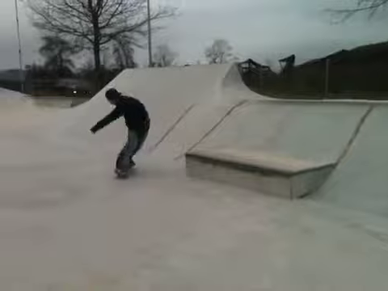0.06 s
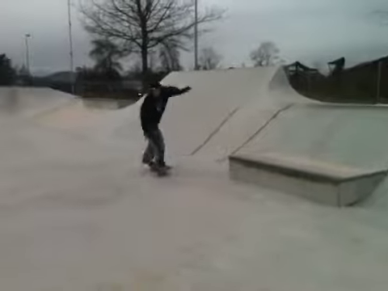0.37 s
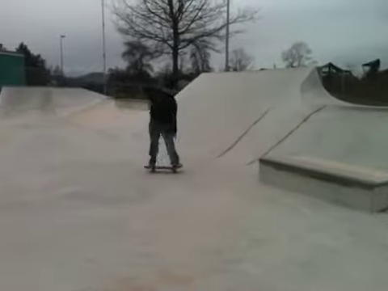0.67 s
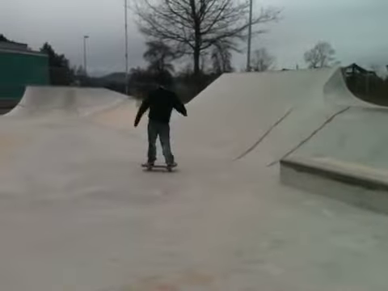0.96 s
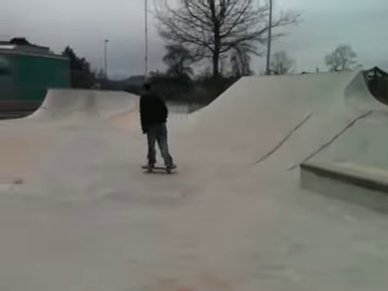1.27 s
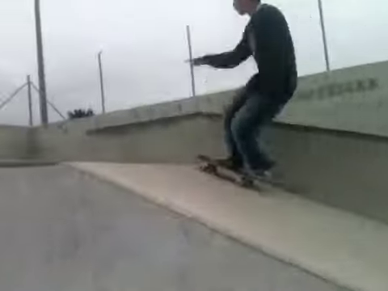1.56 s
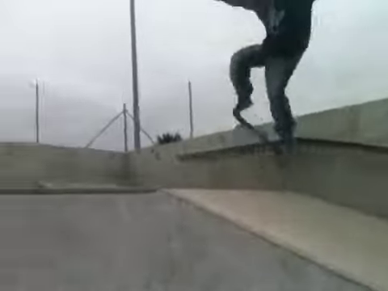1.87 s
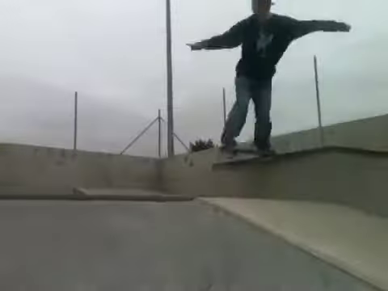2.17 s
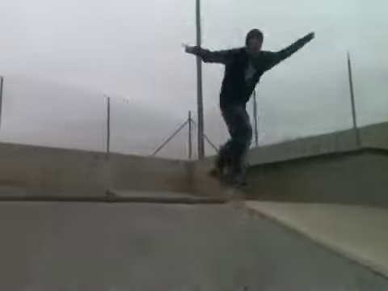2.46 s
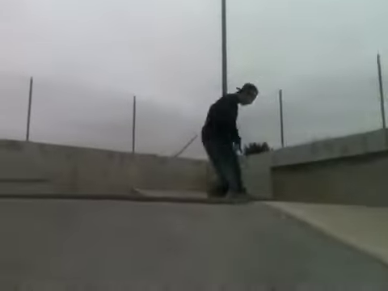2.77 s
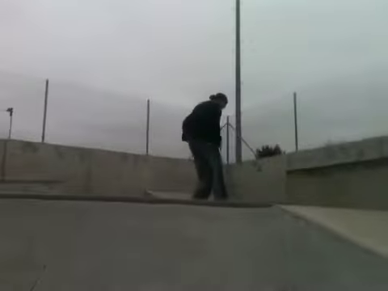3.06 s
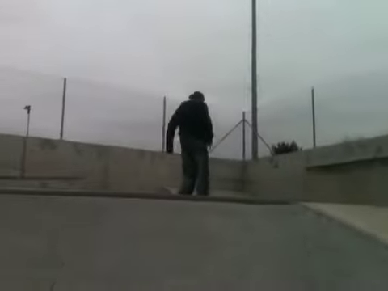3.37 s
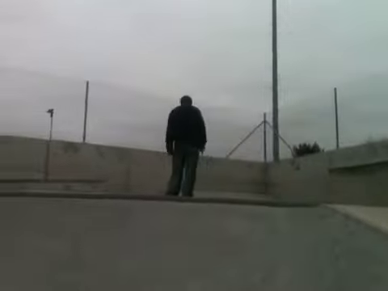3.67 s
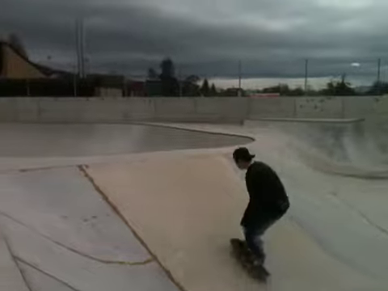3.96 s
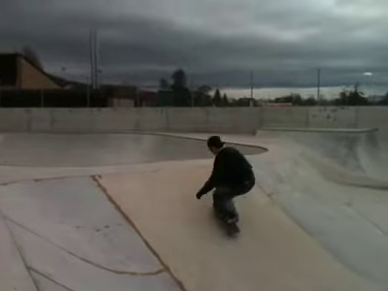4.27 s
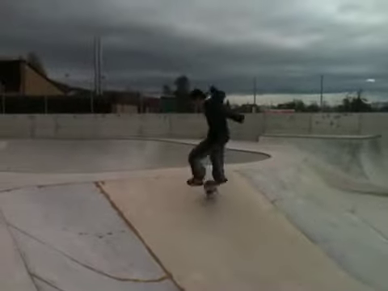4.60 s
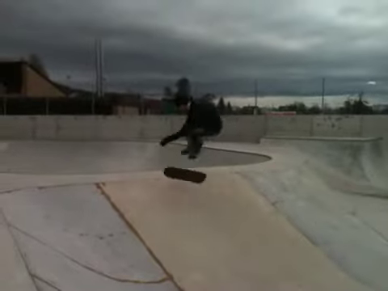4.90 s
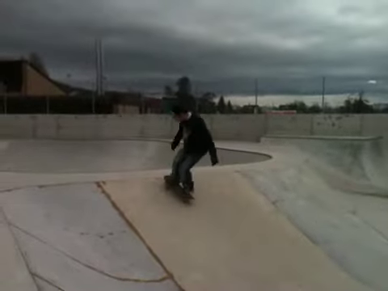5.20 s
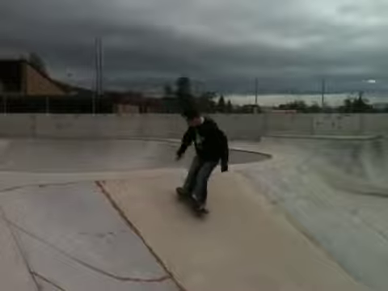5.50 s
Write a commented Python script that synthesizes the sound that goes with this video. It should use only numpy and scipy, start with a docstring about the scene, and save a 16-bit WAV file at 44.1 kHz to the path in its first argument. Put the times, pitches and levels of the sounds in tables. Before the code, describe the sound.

At an open-air skate park, a skateboard clacks down and rolls softly over concrete, a distant engine barely humming behind it. A sharp pop leads to a cluster of wooden knocks and metal clicks, with short echoes off the ramps. Then gusts thump on the microphone as the wheels roar past close by. Another pop and a brief gap end in the loudest landing, and the board rattles on.

```python
"""A concrete skate park, one small microphone, three scenes one after the other: the flat, a ledge and a bank.
A skateboarder pivots, ollies onto the ledge and off, then passes close by to flip on the bank. Wheels roar on
the grain of the slab; tail, trucks and wheels knock the wooden deck in quick clusters, echoed by the ramps.
Wind buffets the microphone at the bank; a far engine hums over quiet open air."""
import sys
import numpy as np
from scipy import signal
from scipy.fft import rfft, irfft, next_fast_len
from scipy.io import wavfile

SR = 44100
rng = np.random.default_rng(int(sys.argv[2]) if len(sys.argv) > 2 else 0)


def to_wav(sig):
    """Store sig (one row per channel, or 1-D mono) as 16-bit WAV at the path in sys.argv[1].

    Samples outside -1..1 are clipped; the rate is SR.
    """
    pcm = np.clip(np.atleast_2d(sig), -1, 1) * 32767
    pcm = np.round(pcm).astype(np.int16)
    wavfile.write(sys.argv[1], SR, pcm.T)  # frames by channels


N = 244314
T = np.arange(N) / SR
RING_T = np.arange(8192) / SR  # time within one hit
# the scene changes at these times, from the flat to the ledge to the bank: t/s
SPOT_BOUNDS = [0, 1.444, 3.72, 5.6]
BANK_START_S = SPOT_BOUNDS[2]


def undb(db):
    """Decibels to gain."""
    return 10 ** (np.asarray(db) / 20)


def unit(x):
    """Scale to rms 1."""
    return x / np.sqrt(np.mean(x ** 2))


def unit_hit(x):
    """Scale a hit to the energy of 10 ms at rms 1."""
    return x / np.sqrt(np.sum(x ** 2) / (SR / 100))


def add(out, s, x):
    """Mix x into out from time s."""
    i = max(int(s * SR), 0)
    out[i:i + len(x)] += x[:max(N - i, 0)]


def highpass(x, hz, order=2):
    """Cut the bass below hz."""
    return signal.sosfilt(signal.butter(order, hz, "highpass", fs=SR, output="sos"), x)


def colour(x, points):
    """Causal filter that follows (f/Hz, level/dB) points."""
    size = next_fast_len(len(x) + 2048) // 2 * 2
    hz, db = np.transpose(points)
    log_gain = np.interp(np.log(np.fft.rfftfreq(size, 1 / SR) + 1), np.log(hz), db) * np.log(10) / 20
    cepstrum = irfft(log_gain)
    cepstrum[1:size // 2] *= 2  # fold to minimum phase
    cepstrum[size // 2 + 1:] = 0
    return irfft(rfft(x, size) * np.exp(rfft(cepstrum)))[:len(x)]


def walk(rate):
    """Random levels 1 / rate s apart, joined by straight lines; spread near 1."""
    knots = rng.standard_normal(2048)
    return np.interp(T * rate, np.arange(len(knots)), knots)


def fade(t60, t=RING_T):
    """Exponential decay, 60 dB down after t60 seconds."""
    return np.exp(-np.log(1000) * t / t60)


def bell(centre_s, half_s, t=T):
    """Smooth Gaussian rise and fall."""
    return np.exp(-((t - centre_s) / half_s) ** 2)


def stretch(start, end, db, fade_db_per_s, attack_s=0.013, release_s=0.016):
    """Gain of a sound that sets in quickly, fades evenly and dies away at its end."""
    gate = np.clip((T - start) / attack_s, 0, 1) * np.exp(-np.maximum(T - end, 0) / release_s)
    return gate * undb(db - fade_db_per_s * (np.clip(T, start, end) - start))


def grains(spread_db):
    """Dense tiny impacts of uneven size, as of wheels on the grain of concrete."""
    size = np.repeat(rng.standard_normal(N // 64 + 1), 64)[:N]
    return rng.standard_normal(N) * undb(spread_db * size)


def resonance(hz, width_hz, spread_db=0):
    """A band of noise driven by grains; its centre may move."""
    lowpass = signal.butter(2, width_hz / 2, fs=SR, output="sos")
    drive = signal.sosfilt(lowpass, grains(spread_db) + 1j * grains(spread_db))
    phase = 2 * np.pi * np.cumsum(hz * np.ones(N)) / SR
    return unit(np.real(drive * np.exp(1j * phase)))


def ring(modes, detune):
    """Struck modes; the point that is hit sets each one's sign and shifts it a little."""
    chance = rng.standard_normal((len(modes), 2))
    return sum(np.sign(side) * undb(db) * fade(t60) * np.sin(2 * np.pi * hz * (1 + detune * by) * RING_T)
               for (hz, db, t60), (side, by) in zip(modes, chance))


# spectrum of the open air around the park: f/Hz, level/dB
AIR_TONE = [(25, -14), (70, -9.5), (120, -1), (200, 1.5), (330, -4.5), (430, -8), (600, -6.5), (1000, -6.5),
            (1700, -10.5), (2400, -20.5), (3100, -24), (4400, -25.5), (7000, -28), (13000, -29.5),
            (15500, -32)]

def open_air(db=-61.5, wander_db=0.7):
    """A soft wash of distant noise that drifts in level."""
    return unit(colour(rng.standard_normal(N), AIR_TONE)) * undb(db + wander_db * walk(rate=2.2))


# pulls of an engine, far off: start/s, end/s, first firing f/Hz, last f/Hz, start level/dB, swell/(dB/s)
ENGINE_PULLS = [(0, 1.46, 161, 165.5, -67, 4.5), (2.259, 2.604, 114.5, 114.6, -71, -1),
                (2.788, 3.743, 146, 169.8, -69, 8.5)]

def far_engine(octave_db=-14):
    """An engine hums at its firing rate: it holds its speed, drops and pulls up again."""
    waver = 1 + 0.005 * walk(rate=10)
    sway = undb(1.2 * walk(rate=6))
    out = np.zeros(N)
    for start, end, start_hz, end_hz, db, swell_db_per_s in ENGINE_PULLS:
        firing_hz = np.interp(T, [start, end], [start_hz, end_hz]) * waver
        phase = 2 * np.pi * np.cumsum(firing_hz) / SR
        hum = unit(np.sin(phase) + undb(octave_db) * np.sin(2 * phase))
        out += hum * stretch(start, end, db, -swell_db_per_s)
    return out * sway


# gusts on the microphone at the bank: t/s, peak level/dB, half length/s
GUSTS = [(3.789, -37.5, 0.027), (3.851, -26, 0.021), (3.964, -34.5, 0.065), (4.146, -27, 0.045),
         (4.22, -25.5, 0.031), (4.492, -60, 0.0085), (4.935, -40, 0.011), (4.995, -36, 0.01),
         (5.037, -41, 0.017), (5.206, -36, 0.094), (5.348, -34.5, 0.0076), (5.53, -41.5, 0.035)]
# strongest eddies, right on the microphone port: t/s, peak level/dB, half length/ms
EDDIES = [(3.79, -24, 1.3), (3.841, -19, 0.9), (3.888, -24, 1.3), (3.963, -23.5, 0.61), (4.128, -20, 0.69),
          (4.143, -18.5, 1.3), (4.162, -19.5, 0.85), (4.2211, -11.5, 0.45), (4.247, -19, 0.77),
          (4.283, -28.5, 1.46), (5.225, -19, 0.65)]

def wind(breeze_db=-59.5, bass_cut_hz=145, lead_s=0.01):
    """Gusts of low turbulence and single pressure bumps, which ring in the microphone's bass cut."""
    strength = undb(breeze_db) + sum(undb(db) * bell(s, half_s) for s, db, half_s in GUSTS)
    tone = [(60, 1.5), (160, 7.5), (280, -5), (400, -8.5), (700, -23), (1500, -35.5), (4000, -110)]
    rumble = highpass(colour(rng.standard_normal(N), tone), bass_cut_hz, order=4)
    out = unit(rumble) * strength * (T >= BANK_START_S)
    for s, db, half_ms in EDDIES:
        bump = highpass(bell(lead_s, half_ms / 1000, RING_T), bass_cut_hz, order=4)
        add(out, s - lead_s, undb(db) * bump / np.abs(bump).max())
    return out


# how strongly the knocks reach the concrete around the rider: t/s, level/dB
ECHO_SEND = [(0, -3), (1.4, 12), (1.5, 3), (2.7, 10), (4.7, 8), (5.1, 0.5), (5.54, 3)]

def ramp_echoes(hits, early_db=-16, early_t60=0.26, late_db=-25, late_t60=1.0):
    """Scattered reflections off nearby ramps, then a faint tail from the far walls."""
    sent = hits * undb(np.interp(T, *np.transpose(ECHO_SEND)))
    t = T[:SR]
    early = rng.standard_normal(SR) ** 3 * fade(early_t60, t) * (t > 0.012)  # cubed: sparse spikes
    late = rng.standard_normal(SR) * fade(late_t60, t) * np.clip(t / 0.02, 0, 1)
    response = (undb(early_db) * unit(early) + undb(late_db) * unit(late)) / np.sqrt(SR)
    echoes = signal.fftconvolve(sent, response)[:N]
    return colour(echoes, [(200, -5.5), (1500, -8.5), (4000, -5.5), (12000, -17)])


# delay of the bank's reflection at the microphone: t/s, lag/ms
BANK_LAG = [(3.73, 0.6), (4.08, 0.56), (4.19, 0.71), (4.4, 0.8), (5.54, 0.83)]

def with_bank_reflection(x, bounce):
    """The bank reflects the middle range; the path grows as the rider climbs, so the dips slide down."""
    lag_s = np.interp(T, *np.transpose(BANK_LAG)) / 1000
    mids = signal.sosfiltfilt(signal.butter(3, [700, 6500], "bandpass", fs=SR, output="sos"), x)
    return x + bounce * (T >= BANK_START_S) * np.interp(T - lag_s, T, mids)


# spectrum of the hollow ramp by the ledge: f/Hz, level/dB
HOLLOW_TONE = [(80, -37), (150, -29), (220, -2), (280, -5), (345, 3), (410, -4), (505, 1), (580, 0.5),
               (720, -11), (1400, -37), (4000, -61.5)]
# its rumbles: start/s, end/s, start level/dB, fade/(dB/s)
HOLLOW_RUMBLES = [(1.44, 1.723, -41.5, 45.5), (3.336, 3.727, -60.5, 10)]

def hollow_ramp():
    """The ramp rumbles hollowly under the wheels."""
    rumble = unit(colour(rng.standard_normal(N), HOLLOW_TONE))
    return rumble * sum(stretch(*row) for row in HOLLOW_RUMBLES)


# noise bands at all three spots: t/s, centre f/Hz, glide/(octaves/s), width/Hz, level/dB, half length/s
SCRAPES_AND_RASPS = [(0.805, 4500, 0.5, 3000, -69, 0.03), (2.3, 1774, 0.5, 90, -67, 0.08),
                     (2.395, 810, 0.5, 130, -59, 0.076), (2.465, 835, -1, 300, -55, 0.026),
                     (2.795, 4130, 0.5, 700, -64.5, 0.032), (2.886, 3770, 0.5, 400, -65, 0.06),
                     (3.741, 3170, 1, 800, -50.5, 0.016), (3.813, 3100, -0.5, 900, -51, 0.065),
                     (4.593, 4700, -3, 2000, -53.5, 0.016), (4.635, 4400, -1, 1800, -60, 0.017),
                     (5.423, 2030, -1.5, 260, -54, 0.04), (5.484, 1450, -2, 149, -47, 0.028)]

def scrapes_and_rasps():
    """Short gliding noise bands: scrapes, squeals and the rasp of grit coloured by the bank's reflection."""
    out = np.zeros(N)
    for s, hz, octaves_per_s, width_hz, db, half_s in SCRAPES_AND_RASPS:
        pitch = hz * 2 ** (octaves_per_s * np.clip(T - s, -2 * half_s, 2 * half_s))
        out += resonance(pitch, width_hz, spread_db=5.5) * undb(db) * bell(s, half_s)
    return out


# whirr of a free wheel: f/Hz, level/dB
SPIN_TONE = [(200, -24), (600, 0.5), (1300, 3.5), (1800, 4), (2600, -2), (6000, -28)]
# hiss of the bearings, and of grit on the flat and by the ledge: f/Hz, level/dB
HISS_TONE = [(1800, 0), (3000, -6.5), (3800, 2), (4700, 0), (5600, -5), (6800, -8), (8500, -5.5),
             (11000, -12.5), (14000, -20), (16000, -36)]
# flights at the ledge and the bank: start/s, end/s, whirr level/dB, relative hiss/dB
FLIGHTS = [(1.81, 2.095, -59, 0), (4.705, 5.093, -62, -10.5)]

def free_wheels():
    """In the air the wheels whirr and their bearings hiss, slowly fading."""
    whirr = unit(colour(rng.standard_normal(N), SPIN_TONE))
    bearings = unit(colour(grains(spread_db=-1), HISS_TONE))
    return sum((whirr + undb(hiss_db) * bearings) * stretch(start, end, db, fade_db_per_s=2)
               for start, end, db, hiss_db in FLIGHTS)


def climb(pass_s=4.018, pass_db=-40.5, nearest_m=0.75, speed_m_s=5.83, crest_s=4.92):
    """Gain of the ride past the microphone until take-off: it falls with distance and toward the crest."""
    speed_share = np.maximum(crest_s - T, 0) / (crest_s - pass_s)
    distance_m = np.hypot(nearest_m, speed_m_s * (T - pass_s))
    take_off_s = FLIGHTS[-1][0]
    return stretch(BANK_START_S, take_off_s, pass_db, 0) * speed_share * nearest_m / distance_m


# modes of the wooden deck, stirred by rolling and by knocks: f/Hz, level/dB, t60/s
DECK_MODES = [(330, -4, 0.18), (496, -4.5, 0.07), (585, 4.5, 0.058), (749.5, -6, 0.088), (836, 6, 0.037),
              (930, -15.5, 0.045), (1028, -10.5, 0.028), (1146, -4.5, 0.046), (1305, 8, 0.026),
              (1477, -1.5, 0.064), (1620, 4.5, 0.046), (1756, 7.5, 0.038), (1986, 2, 0.051),
              (2280, 7, 0.023)]

def rolling(roar_gain, hiss_gain, roar_tone, grit_tone, grit_spread_db=2, deck_db=-4):
    """Wheels drive the deck into a roar and crush grit into a hiss; both flutter with the slab."""
    flutter = undb(0.3 * walk(rate=37))
    wheel = unit(colour(grains(spread_db=-1), roar_tone))
    jolts = colour(grains(spread_db=6.5), roar_tone)
    deck = unit(signal.fftconvolve(jolts, ring(DECK_MODES, detune=0.0016))[:N])
    grit = unit(colour(grains(grit_spread_db), grit_tone))
    return (unit(wheel + undb(deck_db) * deck) * roar_gain + grit * hiss_gain) * flutter


# roar of the wheels on the flat, by the ledge and on the bank: f/Hz, level/dB
ROAR_FLAT = [(100, -28), (220, 3.5), (400, -8), (750, 1), (1200, -4), (1700, -6), (2300, -9), (3000, -18),
             (5000, -36)]
ROAR_LEDGE = [(60, -38), (120, -25), (220, -8), (350, 4.5), (510, 2), (700, 2.5), (900, 5), (1300, 4.5),
              (1900, 8), (2400, 5.5), (2900, -13), (5000, -24.5)]
ROAR_BANK = [(100, 10.5), (250, -12), (360, 9.5), (450, 6), (590, 13), (750, 7.5), (1050, 3), (1700, 1.5),
             (2400, 2), (3300, -7.5), (5000, -24)]
# hiss of grit on the bank, close to the microphone: f/Hz, level/dB
BANK_HISS_TONE = [(1800, -3.5), (2700, 4), (3300, 1), (4200, 5), (5200, 5.5), (6800, 5), (8500, 2.5),
                  (11000, -2.5), (13300, -21), (16000, -36)]
# runs over the concrete: start/s, end/s, start level/dB, fade/(dB/s), relative hiss/dB
ROLLS = [(0, 0.218, -40.5, 62, -4), (0.266, 0.653, -55.5, 7.5, -8.5), (0.726, 1.45, -57.5, 6.5, -11),
         (1.44, 1.853, -46.5, 18.5, -2), (2.1, 2.616, -48, 35.5, -3), (2.664, 3.283, -61, 23.5, 1),
         (3.263, 3.72, -62.5, 16, -5.5), (3.704, 3.915, -61, 37, -18), (5.174, 5.52, -53.5, -3.5, -12.5)]

def wheels(climb_grit_db=-10.5):
    """The wheels roll over the flat, by the ledge and up the bank, each with its own surface."""
    roar, hiss = np.zeros((2, len(SPOT_BOUNDS) - 1, N))
    for start, end, db, fade_db_per_s, grit_db in ROLLS:
        spot = np.searchsorted(SPOT_BOUNDS, (start + end) / 2) - 1
        gain = stretch(start, end, db, fade_db_per_s)
        roar[spot] += gain
        hiss[spot] += gain * undb(grit_db)
    uphill = climb()
    roar[2] += uphill
    hiss[2] += uphill * undb(climb_grit_db)
    flat = rolling(roar[0], hiss[0], ROAR_FLAT, HISS_TONE)
    ledge = rolling(roar[1], hiss[1], ROAR_LEDGE, HISS_TONE)
    bank = rolling(roar[2], hiss[2], ROAR_BANK, BANK_HISS_TONE, grit_spread_db=1.5)
    return flat + ledge + with_bank_reflection(bank, bounce=0.33)


def chatter(t60_ms, rebounds_db=-1):
    """Force of a contact: a first strike, then ever smaller rebounds and scrapes as it settles."""
    size = rng.standard_normal(len(RING_T))
    force = undb(rebounds_db) * size * np.abs(size) * fade(max(t60_ms, 1) / 1000)
    force[0] = 5  # the first strike
    return force


def struck(modes, force):
    """Modes driven by the force of a contact."""
    return unit_hit(signal.fftconvolve(ring(modes, detune=0.012), force)[:len(RING_T)])


def crack(tone, chatter_ms, t60, rise_s=0.0006):
    """Noise of a contact: its force takes a moment to build, and chatter draws it out."""
    rise = 1 - np.exp(-RING_T / rise_s)
    decay = fade(np.hypot(t60, chatter_ms / 1000))
    return unit_hit(colour(rng.standard_normal(len(RING_T)) * rise * decay, tone))


def free_modes(mode_hz, rise_s=0.00082, t60_share=0.76, detune=0.006):
    """The deck modes nearest the given pitches swell and ring, shifted and damped by the rider's feet."""
    modes = [min(DECK_MODES, key=lambda mode: abs(mode[0] - hz)) for hz in mode_hz]
    shift = 1 + detune * rng.standard_normal()
    swell = 1 - np.exp(-RING_T / rise_s)
    tones = [swell * fade(t60 * t60_share) * np.sin(2 * np.pi * hz * shift * RING_T) for hz, _, t60 in modes]
    return unit_hit(sum(map(unit_hit, tones)))


# crack of a contact in wood: f/Hz, level/dB
WOOD_CRACK = [(200, -27), (400, -24.5), (600, -6.5), (1300, -12.5), (2000, -4.5), (2400, -7), (2800, -7.5),
              (5000, -47)]

def deck_knock(force, hz, chatter_ms, ring_db, mode_hz, crack_db=-3):
    """The deck cracks and rings around hz: soft wheels stir its low modes, the hard tail its high ones."""
    wood = struck(DECK_MODES, force) + undb(crack_db) * crack(WOOD_CRACK, chatter_ms, t60=0.025)
    wood = unit_hit(colour(wood, [(80, -24), (hz / 2, -6), (hz, 0), (hz * 2, -10)]))
    wood = unit_hit(wood + undb(ring_db) * free_modes(mode_hz))
    return highpass(wood, hz=210)  # the narrow deck radiates little bass


# crack of a contact in metal: f/Hz, level/dB
METAL_CRACK = [(1500, -18), (2700, -9.5), (3200, 2), (4400, 8.5), (5400, 4.5), (6700, -7), (8700, -4),
               (11000, -12), (13500, -15), (16000, -25)]
# modes of the trucks and bearings: f/Hz, level/dB, t60/s
TRUCK_MODES = [(3370, 4, 0.035), (3960, 14, 0.013), (4490, 11.5, 0.017), (4780, -10, 0.012),
               (5430, -4, 0.01), (6660, 0.5, 0.03)]

def truck_click(force, chatter_ms, tilt_db, ring_db=-4):
    """The metal trucks click and ring briefly; the tilt sets how bright they are."""
    metal = crack(METAL_CRACK, chatter_ms, t60=0.02) + undb(ring_db) * struck(TRUCK_MODES, force)
    return unit_hit(colour(metal, [(4500, 0.021), (8000, tilt_db + 2)]))


# bending modes of the whole board: f/Hz, level/dB, t60/s
FLEX_MODES = [(166, -4, 0.035), (251, -5.5, 0.037), (333, -5, 0.046), (404, -12, 0.049)]

def flex_thud(force):
    """The whole board flexes under the rider with a low thud."""
    return unit_hit(colour(struck(FLEX_MODES, force), [(70, -13.5), (190, 0.5)]))


def knock(hz, thud_db, click_db, tilt_db, chatter_ms, ring_db, mode_hz):
    """One blow rings the deck, clicks the trucks and flexes the board; thud and click trim the mix."""
    force = chatter(chatter_ms)
    wood = deck_knock(force, hz, chatter_ms, ring_db, mode_hz)
    metal = truck_click(force, chatter_ms, tilt_db)
    return undb(-1) * wood + undb(thud_db - 5.5) * flex_thud(force) + undb(click_db - 4.5) * metal


def rattle(hz, click_db, chatter_ms):
    """A light knock with little thud; the deck mode nearest its tone rings out."""
    return knock(hz, thud_db=-5.5, click_db=click_db, tilt_db=7, chatter_ms=chatter_ms,
                 ring_db=-2, mode_hz=[hz])


# pops and landings at all three spots: t/s, first level/dB, gap/ms, second level/dB, wood f/Hz,
# thud trim/dB, click trim/dB, click tilt/dB, chatter t60/ms, relative ring/dB, ringing modes f/Hz
CLACKS = [(.006, -33.5, 7, -47, 930, -4, -6, 6, 1.3, -2, (585, 1040)),
          (0.0359, -34, 9.2, -25.5, 1850, -26, 4, 8, 23, -2, (585, 755, 1635, 1735, 2285)),
          (0.2334, -30.5, 7.6, -29, 1090, -20, -6, 6, 20, 3, (585, 755, 835, 1322, 1478)),
          (0.6606, -39.5, 4.45, -35, 1350, -14, -2.5, 9.5, 6.9, 2.5, (925, 1128, 1322, 1635)),
          (1.8202, -29.5, 2.2, -24.5, 1330, -15.5, 6.5, -9, 3.9, -11, (505, 1322, 1735)),
          (1.8591, -34, 10.7, -39.5, 890, -13, -3, -8, 36, -5, (505, 835, 925)),
          (2.1001, -33.5, 2.6, -33, 1590, -10.5, -3, 5.5, 5.6, -8.5, (330, 1128, 1635, 1990)),
          (2.1537, -35.5, 0.92, -40, 1600, -10, 2.5, 7, 2.4, -7, (1322, 1635, 1990)),
          (2.6113, -25.5, 4.2, -28, 1200, -11.5, -4, 8, 42, -3.5, (505, 755, 1128, 1322)),
          (2.637, -25.5, 3.4, -23.5, 1150, -8, -9, 12.5, 10, 0, (505, 835, 1128)),
          (4.6702, -38.5, 2.3, -29.5, 1930, -17, -7.5, -5, 2.2, 1.9, (1128, 1322, 2285)),
          (5.0922, -24.5, 11.3, -33, 1190, 6.5, -6, 3, 17, 2, (1128, 1322)),
          (5.1346, -16, 3.82, -10.5, 990, -4, -6.5, 4.5, 17.4, 0, (585, 1039, 1128, 1322, 1478)),
          (5.147, -25, 3.1, -33, 636, 3, -3.5, -1, 15, -6, (330, 585))]
# rattles as the weight shifts or a wheel meets a joint:
# t/s, level/dB, wood f/Hz, click trim/dB, chatter t60/ms
RATTLES = [(0.068, -36, 1990, -7, 12), (0.0714, -42, 1635, -17, 5), (.262, -44.5, 1350, -5.5, 17),
           (0.383, -49, 840, -6.5, 40), (0.674, -39.5, 1310, -11, 9), (0.685, -46, 1376, -15, 7.9),
           (1.783, -60, 1690, 9, 3), (1.798, -42, 1990, -14, 25), (1.808, -44, 1900, -6, 5.4),
           (1.831, -42, 1590, -2, 3.9), (1.851, -40.5, 1210, -4, 16), (1.87, -45, 930, -9, 20),
           (1.8877, -52, 1410, -2, 4), (1.908, -46, 1470, -1.5, 6.4), (1.926, -49, 1490, -12, 4.4),
           (2.032, -53.5, 1480, 0, 29), (2.119, -39, 1384, -1.5, 6.7), (2.128, -43, 1110, -3, 23),
           (2.138, -48, 1500, 3, 4.4), (2.143, -49, 1700, -5, 8), (2.184, -41.5, 1150, -12, 20),
           (2.234, -44, 1710, -7, 14), (2.301, -47, 1374, -2, 8.7), (2.317, -59, 1500, 5, 3.4),
           (2.364, -42, 1740, -2.5, 66), (2.39, -46, 870, -1, 17), (2.398, -51.5, 794, -7, 12),
           (2.467, -46.5, 1130, -9, 28), (2.475, -54, 1130, -12, 16), (2.667, -33, 850, -15.5, 65),
           (2.686, -44.5, 1050, -6, 32), (2.719, -48, 402, -23, 28), (2.734, -49.5, 1300, -24, 21),
           (3.023, -58.5, 1077, -2, 23), (3.3475, -51, 1210, 1.5, 31), (3.358, -50.5, 1480, -7, 46),
           (3.365, -51.5, 1130, 0.5, 8), (3.375, -56, 1170, -2, 3), (3.382, -50.5, 1170, -8, 160),
           (4.507, -56, 1420, 3.5, 110), (4.573, -53, 1530, 2.5, 300), (4.654, -43, 1600, -11, 45),
           (4.688, -44, 1900, -10, 35), (5.0671, -38.5, 1600, -5, 14), (5.0714, -40.5, 1470, -13, 15),
           (5.118, -43, 1300, -2, 15), (5.1275, -31, 1310, -1, 12), (5.186, -41, 840, -11, 45),
           (5.206, -36, 770, -15, 38), (5.289, -38.5, 1690, -6, 43), (5.333, -38.5, 960, -18, 46),
           (5.343, -43.5, 1300, -18, 28), (5.4579, -39, 1635, -3, 84), (5.477, -43.5, 1470, -9, 60),
           (5.495, -40, 1100, -8, 51), (5.512, -49, 1410, -2, 14)]

def board_knocks(cushion_db=-3.5, rebound_s=0.027):
    """Each clack is two contacts, the second cushioned, and a rebound; lighter rattles fall between."""
    out = np.zeros(N)
    for s, first_db, gap_ms, second_db, hz, thud_db, click_db, *timbre in CLACKS:
        second_s = s + gap_ms / 1000
        rebound_db = -47.5 + 0.14 * max(first_db, second_db)  # a little louder after a hard clack
        add(out, s, undb(first_db) * knock(hz, thud_db, click_db, *timbre))
        add(out, second_s, undb(second_db) * knock(hz, thud_db, click_db + cushion_db, *timbre))
        add(out, second_s + rebound_s, undb(rebound_db) * rattle(hz=1130, click_db=-4.5, chatter_ms=40))
    for s, db, hz, click_db, chatter_ms in RATTLES:
        add(out, s, undb(db) * rattle(hz, click_db, chatter_ms))
    return out


def scene():
    """Board, echoes, wind and distant background at one microphone."""
    hits = board_knocks()
    riding = wheels() + free_wheels() + hollow_ramp() + scrapes_and_rasps()
    board = with_bank_reflection(hits, bounce=0.14) + riding
    return (board + ramp_echoes(hits) + wind() + far_engine() + open_air())[None]


def record(dry):
    """The small recorder thins the bass, whines faintly, rounds the hardest peaks and cuts the top."""
    ceiling, top_hz = 0.8, 15800
    thin = highpass(dry, hz=85)
    whine = undb(-85) * resonance(hz=14800, width_hz=150)
    rounded = ceiling * np.tanh((thin + whine) / ceiling)
    return signal.sosfilt(signal.ellip(10, 0.2, 80, top_hz, fs=SR, output="sos"), rounded)


dry = scene()
out = record(dry)
to_wav(out)
```